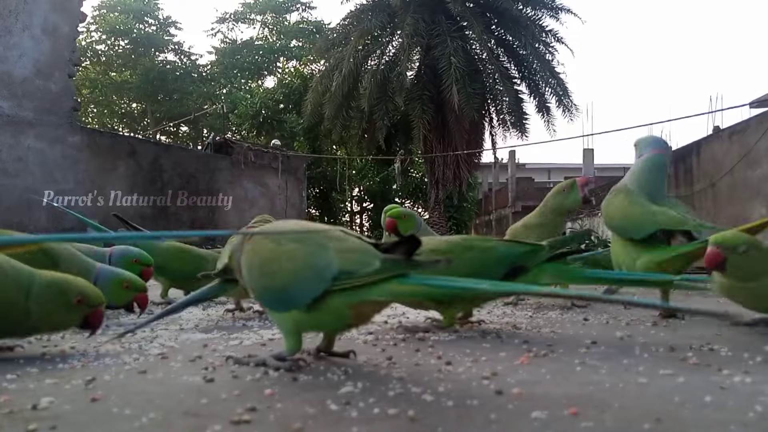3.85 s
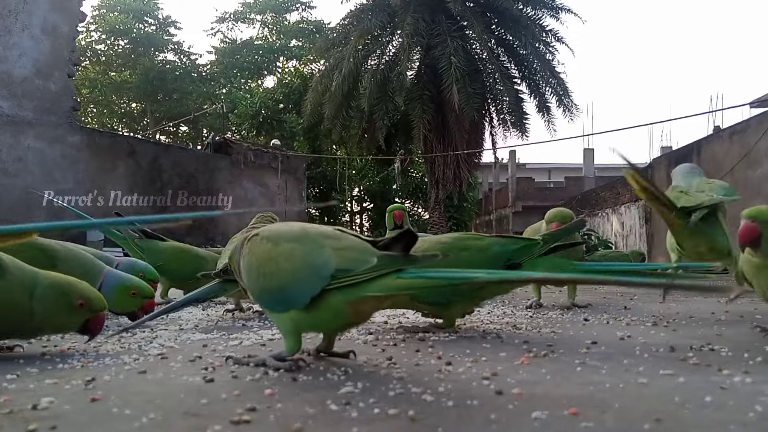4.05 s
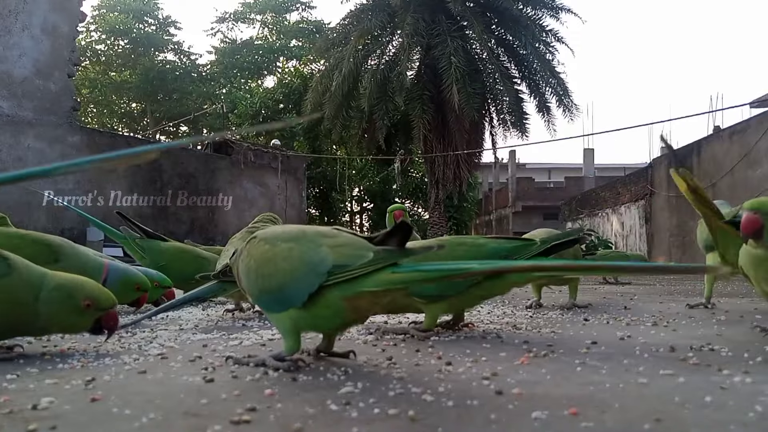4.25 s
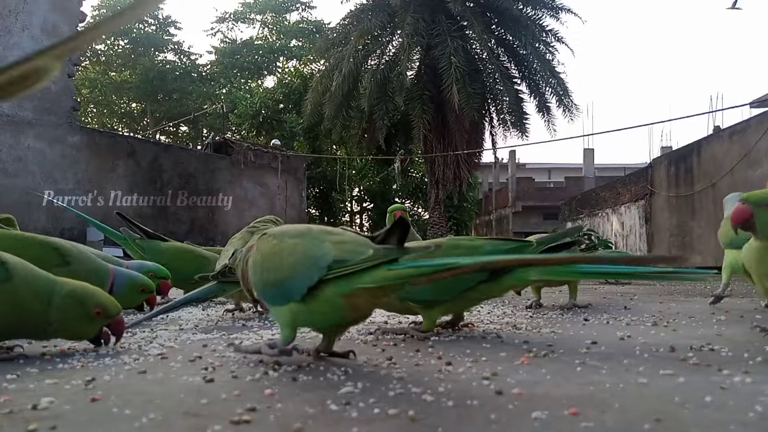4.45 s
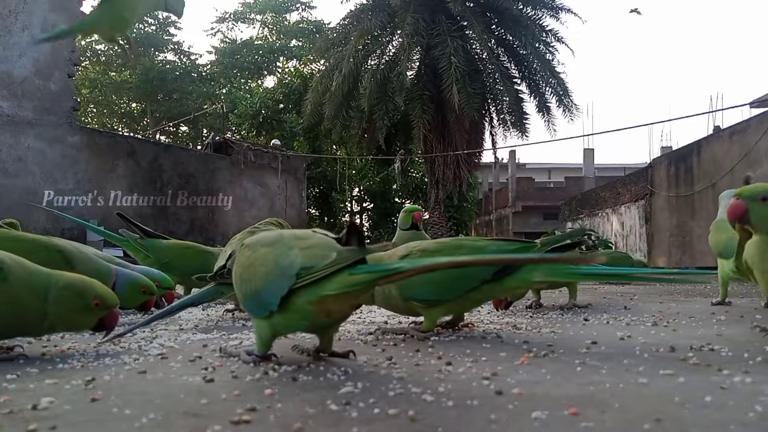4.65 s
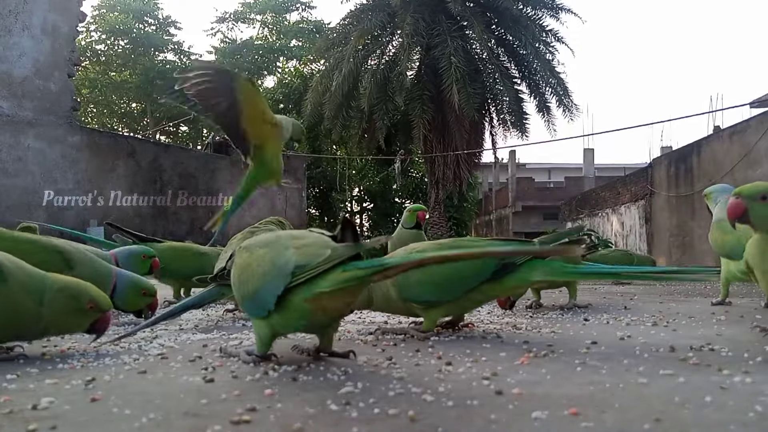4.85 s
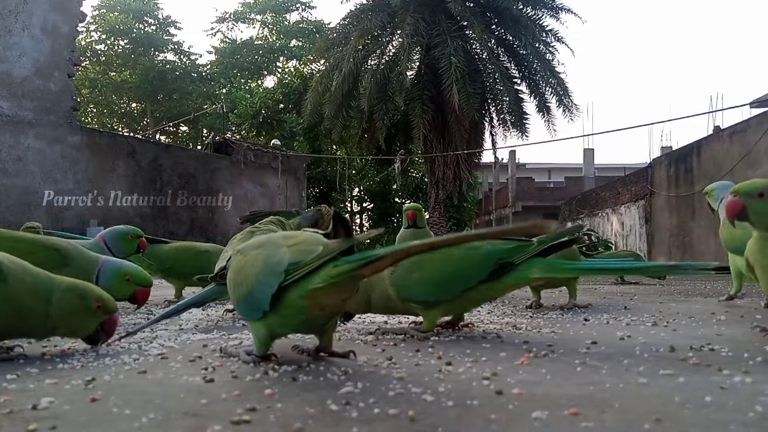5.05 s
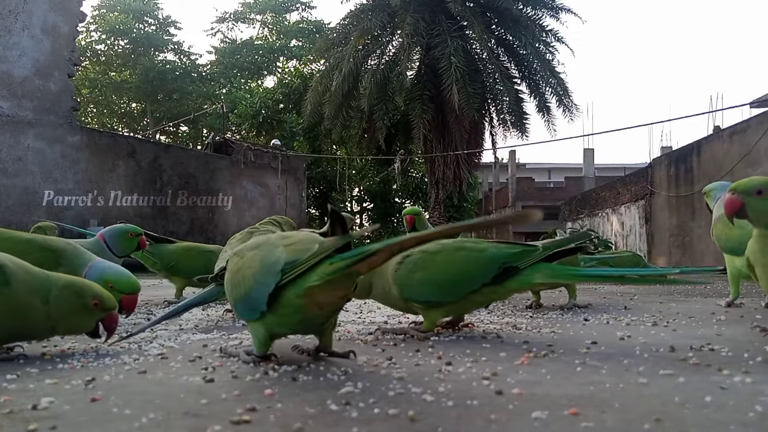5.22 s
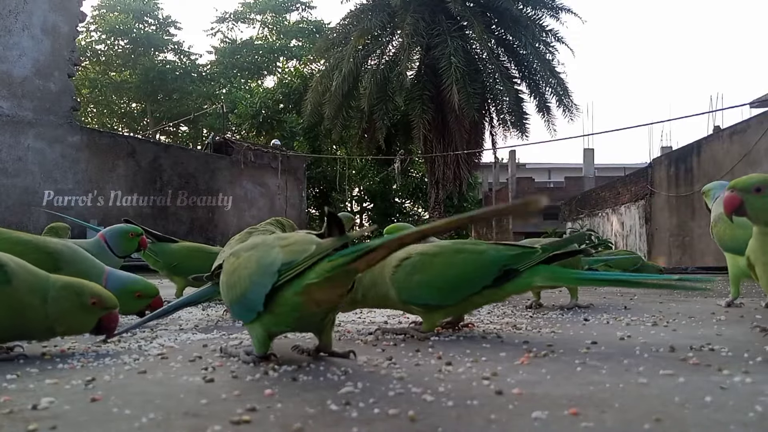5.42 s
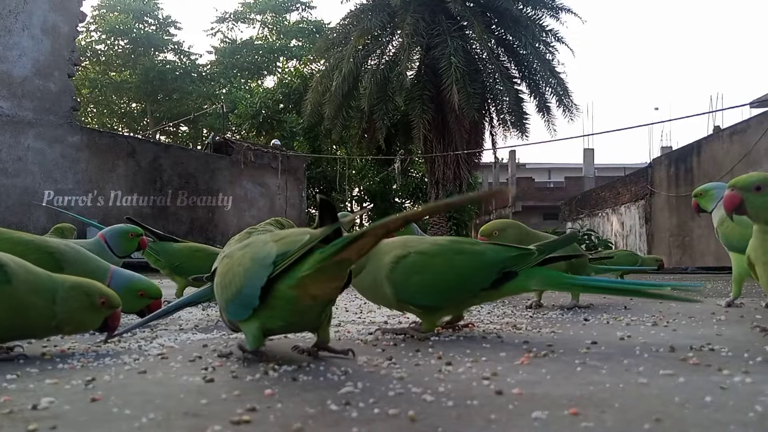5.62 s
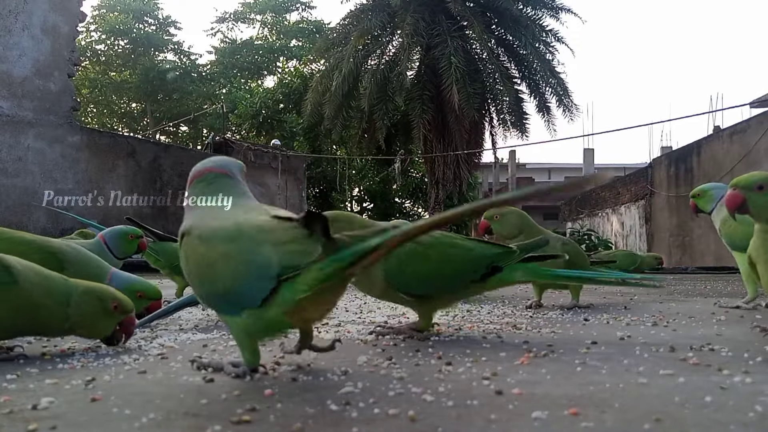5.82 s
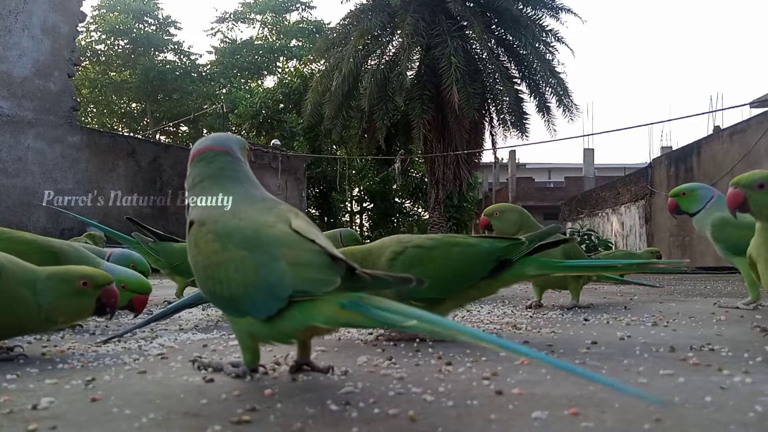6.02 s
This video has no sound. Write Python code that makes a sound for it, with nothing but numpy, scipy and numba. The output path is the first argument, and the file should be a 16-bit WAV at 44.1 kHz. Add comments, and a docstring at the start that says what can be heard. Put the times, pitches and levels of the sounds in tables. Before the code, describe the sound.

Parakeets feeding on a hard open surface: faint beak ticks, distant squawks and wing thumps, then suddenly loud whistled chirps right beside the microphone.

```python
"""A walled concrete roof where parakeets feed. Birds next to the microphone whistle, chuck and trill as stacked
partials; growls ring a throat tube with slow pulses. Calls and screeches from further off are rasped tones and
throbbing whistles in noise, blurred by echoes off the walls. Beaks tick as short rings, wing draughts
thump and rustle as gusty noise, a thin band of noise whines in the distance over the hush of the town."""
import sys
import numpy as np
from scipy import signal
from scipy.fft import rfft, irfft
from scipy.io import wavfile
from scipy.ndimage import uniform_filter1d
from numba import njit

SR = 44100
rng = np.random.default_rng(int(sys.argv[2]) if len(sys.argv) > 2 else 0)


def materialize(psi):
    """Save the field psi as 16-bit PCM at rate SR to the path in sys.argv[1].

    A 1-D psi becomes a single channel; in a 2-D psi each row is a channel.
    """
    bounded = np.clip(np.atleast_2d(psi).T, -1, 1)
    quanta = np.round(bounded * 32767).astype(np.int16)
    wavfile.write(sys.argv[1], SR, quanta)


N = 272538
TOP_HZ = 15700  # upper limit of voices and recorder


def undb(db):
    """Amplitude factor of a level in dB."""
    return 10 ** (np.asarray(db) / 20)


def unit(x):
    """Scale to rms 1."""
    return x / np.sqrt(np.mean(x ** 2))


def colour(points, hz):
    """Level in dB of a spectrum table at given frequencies, interpolated over log frequency."""
    f, db = np.transpose(points)
    return np.interp(np.log(hz), np.log(f), db)


def spectrum_noise(db, hz_share=1.0):
    """Noise of length N whose spectrum follows a level in dB and an optional share per frequency."""
    return irfft(rfft(rng.standard_normal(N)) * hz_share * undb(db), N)


def spectrum_hz():
    """Frequencies of the spectrum bins, at least 1 Hz."""
    return np.maximum(np.arange(N // 2 + 1) * SR / N, 1)


def read(rows, fade_s):
    """First sample, a soft-edged gate and the columns of a curve table, sample by sample."""
    s, *columns = np.transpose(rows)
    i = np.arange(int(s[0] * SR), min(int(s[-1] * SR), N))
    gate = np.clip(np.minimum(i - i[0], i[-1] - i) / (fade_s * SR), 0, 1)
    heard = i >= 0
    return max(i[0], 0), gate[heard], [np.interp(i[heard] / SR, s, c) for c in columns]


def walk(rate_hz, size=N):
    """Random levels held 1 / rate_hz seconds and smoothed twice; spread near 1."""
    k = max(int(SR / rate_hz), 1)
    held = np.repeat(rng.standard_normal(size // k + 1), k)
    return 1.4 * uniform_filter1d(uniform_filter1d(held, k), k)[:size]


@njit
def svf(x, hz, width):
    """State-variable band-pass with a moving centre, gain 1 at the centre."""
    y, b, l = np.empty(len(x)), 0., 0.
    for i in range(len(x)):
        g, k = np.tan(np.pi * hz[i] / SR), width / hz[i]
        v = (b + g * (x[i] - l)) / (1 + g * (g + k))
        b, l, y[i] = 2 * v - b, l + 2 * g * v, k * v
    return y


def band(x, hz, width_hz):
    """One resonance with a fixed or moving centre."""
    return svf(x, np.clip(hz + np.zeros(len(x)), 10, SR / 2.2), 1. * width_hz)


def steep(x, hz, width_hz):
    """A resonance applied twice, at rms 1."""
    return unit(band(band(x, hz, width_hz), hz, width_hz))


def walls(x, t60_s, wet_db, first_s):
    """Direct sound plus a dense decaying cloud of echoes; the walls return little bass."""
    t = np.arange(int(SR * t60_s)) / SR
    echoes = band(rng.standard_normal(SR)[:len(t)], 3800, 5500)
    cloud = echoes * np.exp(-np.log(1000) * t / t60_s) * (t > first_s)
    cloud = cloud * undb(wet_db) / np.sqrt(np.sum(cloud ** 2))
    return x + signal.fftconvolve(x, cloud)[:N]


def town():
    """Distant hush: shaped noise whose octaves flicker a little on their own."""
    # Town spectrum. Each row: frequency in Hz, relative level in dB.
    town_spectrum = [(15, -63), (25, -37), (48, -5.5), (150, -2), (333, -7), (399, -7), (1080, -15),
                     (1330, -11), (1710, -14.5), (2140, -3), (2690, -21), (2940, -12), (3220, -18.5),
                     (4130, -20.5), (5680, -25.5), (7380, -52), (12500, -120)]
    level_db = -68.5
    hz = spectrum_hz()
    out = 0
    for centre_hz in 31.25 * 2 ** np.arange(10):
        share = np.cos(np.pi / 2 * np.clip(np.log2(hz / centre_hz), -1, 1))
        out = out + undb(1.0 * walk(20)) * spectrum_noise(colour(town_spectrum, hz), share)
    return unit(out) * undb(level_db)


def whine():
    """A thin band of noise, wavering in level, with a gliding pitch."""
    # Whine glide. Each row: time in seconds, centre in Hz, level in dB.
    glide = [(1.2, 1160, -82.5), (1.36, 1228, -76), (1.9, 1282, -66.5), (2.6, 1354, -69), (2.75, 1337, -62),
             (2.82, 1365, -77.5), (3.2, 1380, -75)]
    out = np.zeros(N)
    a, gate, (hz, db) = read(glide, 0.022)
    size = len(hz)
    tone = steep(rng.standard_normal(N)[:size], hz, 100)
    out[a:a + size] = gate * undb(db + 3 * walk(12)[:size]) * tone
    return out


def draught():
    """Air from beating wings buffets the microphone: gusty thumps with a wandering rustle on top."""
    # Wing beats. Each row: start, strongest point and end in seconds, thump level in dB, rustle level in dB,
    # rustle centre in Hz.
    wing_beats = [(1.627, 1.686, 1.74, -61, -66.5, 220), (1.68, 1.713, 1.76, -66, -56.5, 315),
                  (1.731, 1.78, 1.84, -55.5, -61, 252), (1.817, 1.903, 1.95, -53, -57, 302),
                  (1.94, 1.991, 2.04, -59, -57, 277), (2.017, 2.08, 2.15, -57.5, -55, 230),
                  (2.14, 2.215, 2.26, -64, -67, 220), (4.445, 4.606, 4.8, -64.5, -66.5, 258)]
    rise_db, fall_db = -13, -12
    feather_ratio, feather_db = 2.4, -10.5  # a fainter upper rustle
    out = np.zeros(N)
    for s, top, end, thump_db, rustle_db, hz in wing_beats:
        a, gate, (db,) = read([(s, rise_db), (top, 0), (end, fall_db)], 0.011)
        size = len(gate)
        air = rng.standard_normal(N)[:size] * undb(3 * walk(25)[:size])
        centre_hz = hz * undb(1.2 * walk(15)[:size])
        thump = steep(air, 85, 48)
        rustle = steep(air, centre_hz, 190)
        rustle = rustle + undb(feather_db) * steep(air, feather_ratio * centre_hz, 250)
        out[a:a + size] += gate * undb(db) * (undb(thump_db) * thump + undb(rustle_db) * rustle)
    return out


def ticks():
    """Beaks on seed and concrete: each tick is a short ring with a crack of treble; small ones fall at random."""
    # Beak ticks. Each row: time in seconds, ring level in dB, ring pitch in Hz, treble in dB against the ring.
    beak_ticks = [(0.3137, -48, 2140, -21), (0.5526, -53, 2240, -34), (0.7487, -46, 1900, -32),
                  (0.857, -48, 1800, -25), (0.9234, -51.5, 1390, -22), (1.0076, -50, 2090, -27),
                  (1.2481, -52, 2100, -29), (1.6242, -54, 1280, 2), (1.7855, -44, 1280, -9),
                  (2.4694, -46, 2040, -20), (2.802, -56, 2000, -4), (3.5099, -42.5, 2180, -27),
                  (3.5716, -50.5, 1930, -24), (3.6632, -42, 2100, -25), (3.673, -52, 2090, -2),
                  (3.9069, -41.5, 1720, -22), (3.9233, -45, 2100, -24), (4.4992, -50.5, 1790, -21),
                  (6.0175, -46, 2360, -36)]
    out, t = np.zeros(N + SR), np.arange(int(.012 * SR)) / SR
    small = [(N / SR * a, -64 + 8 * b, 1200 + 1500 * c, -14.) for a, b, c in rng.random((40, 3))]
    for s, db, hz, treble_db in list(beak_ticks) + small:
        a = int(s * SR)
        crack = steep(rng.standard_normal(len(t)), 4500, 4000) * np.exp(-t / .0006)
        ring = np.sin(2 * np.pi * hz * t) * np.exp(-t / .0009)
        out[a:a + len(t)] += undb(db) * (ring + undb(treble_db) * crack)
    return out[:N]


def screeches():
    """An unsteady whistle whose pitch and level throb fast, with turbulent air around it."""
    # Far screeches. Each row: start in seconds, length in seconds, level in dB, first and last pitch in Hz,
    # mean throb rate in Hz, throb depth in dB, broad breath in dB.
    screech_rows = [(-.06, 0.47, -57.5, 3334, 3642, 168.6, 1, -14),
                    (1.82, .39, -54, 3274, 3750, 169.6, 2.5, -4), (2.255, 0.083, -49, 3700, 3880, 64, 5, 5),
                    (2.806, 0.16, -57.5, 3860, 3550, 56.8, 11.5, -11),
                    (3.453, 0.14, -66.5, 3600, 3860, 150, 3, -18),
                    (4.64, 0.48, -51.5, 4610, 3554, 184, 3.5, -4)]
    # Swell common to all. Each row: share of length, level in dB, upper band in dB, share of the glide done.
    swell = [(0, -19, -16.5, 0), (0.131, -8, -19, .4), (0.271, 0, -29, .6), (.45, 0.5, -28, .8),
             (.6, -2, -9.5, .85), (.8, -9, -0.5, 1), (1, -24, -3.5, 0.99)]
    lower_band_db = -11  # a faint strand under each screech
    out, (share, swell_db, top_db, glide) = np.zeros(N), np.transpose(swell)
    for s, length, level_db, first, last, throb_hz, depth_db, broad_db in screech_rows:
        pitch_hz = first + (last - first) * glide
        rows = np.transpose([s + length * share, level_db + swell_db, pitch_hz, top_db])
        a, gate, (db, hz, upper_db) = read(rows, 0.0081)
        size = len(hz)
        slow, quick, air = walk(40)[:size], walk(120)[:size], rng.standard_normal(N)[:size]
        throb = np.sin(2 * np.pi * np.cumsum(throb_hz * (1 + 0.097 * slow)) / SR)
        whistle_hz = hz * (1 + .011 * depth_db * throb + .02 * quick)
        whistle = np.sqrt(2) * np.sin(2 * np.pi * np.cumsum(whistle_hz) / SR)
        breath = .5 * steep(air, hz, 810)
        breath = breath + undb(upper_db) * steep(air, 1.21 * hz, 160)
        breath = breath + undb(broad_db) * steep(band(air, hz, 1800), hz, 1300)
        breath = breath + undb(lower_band_db) * steep(air, .8 * hz, 250)
        out[a:a + size] += gate * undb(db) * unit(undb(depth_db * throb) * (whistle + breath))
    return out


def growls():
    """Slow, soft, uneven glottal pulses ring the throat tube."""
    # Creaky growls. Each row: start, loudest point and end in seconds, first and last mean pulse rate in Hz,
    # level in dB, throat pitch in Hz, lift of the upper resonances in dB.
    growl_rows = [(2.946, 3.025, 3.065, 77.7, 112.1, -46.5, 781, 3.5),
                  (4.49, 4.611, 4.613, 86, 129, -49, 945, 4)]
    # Throat tube resonances. Each row: multiple of throat pitch, width in Hz, level in dB.
    tube = [(1, 240, 0), (1.95, 420, -3), (4.0, 700, -13), (6.5, 1400, -30)]
    mutter_db, surge_s, end_db = -22.5, .04, -28  # a mutter, then a surge
    out = np.zeros(N)
    for s, loudest, end, first, last, level_db, hz, lift_db in growl_rows:
        low_db, surge = level_db + mutter_db, max(loudest - surge_s, s)
        rows = [(s, first, low_db), (surge, first, low_db + 6),
                (loudest, last, level_db), (end, last, level_db + end_db)]
        a, gate, (rate_hz, db) = read(rows, 0.0029)
        size = len(db)
        cycles = np.cumsum(rate_hz * (1 + .09 * walk(80)[:size])) / SR
        pulses = -np.diff(np.floor(cycles), prepend=0) * undb(2 * walk(71.8)[:size])
        pulses = uniform_filter1d(pulses, size=5)  # the folds close softly
        ring = sum(undb(g_db + lift_db * (m > 1)) * steep(pulses, m * hz, w) for m, w, g_db in tube)
        out[a:a + size] += gate * undb(db) * ring
    return out


def notes(table, flutter_db, jitter, breath_db):
    """Syrinx tones: partials in pulse phase; those above the listed ones follow the throat."""
    # Throat response. Each row: frequency in Hz, relative level in dB.
    throat = [(500, -11), (1500, 16), (2200, 13), (3200, 2.5), (4500, -13.5), (6000, -36.5), (9000, -59.5),
              (11000, -57.5), (13000, -76), (16000, -65)]
    out = np.zeros(N)
    flutter, waver = undb(flutter_db * walk(180)), 1 + jitter * walk(300)
    air = steep(rng.standard_normal(N), 210, 230)
    for rows in table:
        a, gate, (hz, *db) = read(rows, max(.0025, 2 / rows[0][1]))
        part, top = slice(a, a + len(hz)), len(db)
        turn = 2 * np.pi * np.cumsum(hz * waver[part]) / SR
        for k in range(1, int(TOP_HZ / hz.min())):
            if k <= top:
                level_db = db[k - 1]
            else:
                level_db = db[-1] + colour(throat, k * hz) - colour(throat, top * hz)
            # escaping air smears the upper partials most
            halo = 1 + min(k ** 2 * undb(breath_db), .7) * air[part]
            level = gate * halo * undb(level_db) * (k * hz < TOP_HZ)
            out[part] -= level * np.sqrt(2) * np.cos(k * turn)
    return out * flutter


def call(s, length, first, top, last, share, db1, db2, rasp_db, rasp_hz):
    """Pitch and level arch up to a top and fall away; a rasp chops the level."""
    onset_db, end_db = -4, -2.5  # against the top
    fall_power = 1.25  # 1 = straight fall, more = rounder arch
    thin_db_per_octave = 27  # the 1st partial thins out as the pitch drops below its top
    beak_hz, beak_db_per_octave = 3750, 28  # the 2nd partial is loudest nearest the beak's resonance
    t = np.linspace(0, length, num=80)
    u = t / length - np.clip(share, .02, .98)
    rise, fall = np.maximum(u / u[0], 0), np.maximum(u / u[-1], 0)
    hz = top + (first - top) * rise ** 2 + (last - top) * fall ** fall_power
    shape_db = onset_db * rise + end_db * fall ** 2 + rasp_db * np.sin(2 * np.pi * rasp_hz * t)
    off_octaves = np.abs(np.log2(2 * hz / beak_hz))
    first_db = db1 + shape_db + thin_db_per_octave * np.log2(hz / top)
    second_db = db2 + shape_db - beak_db_per_octave * (off_octaves - off_octaves.min())
    return np.transpose([s + t, hz, first_db, second_db])


def far_birds():
    """Birds further off: rasped calls, one long arched call from the middle distance, and screeches."""
    # Far calls. Each row: start in seconds, length in seconds, first, top and last pitch in Hz, share of length
    # to the top, 1st and 2nd partial in dB, rasp depth in dB.
    far_calls = [ (0.376, 0.13, 3050, 3100, 2810, .5, -65.5, -92, 3.5),
                 (0.412, 0.059, 2230, 2120, 1414, .05, -71, -61, -0.5),
                 (0.558, 0.053, 3560, 3550, 3340, 0.31, -69, -110, 1),
                 (0.652, 0.038, 2830, 2966, 2640, 0.38, -72, -75, -2),
                 (0.855, 0.079, 1980, 2314, 1674, 0.16, -68.5, -61.5, 1),
                 (0.963, 0.045, 2050, 1980, 1360, .1, -84, -70.5, -2),
                 (1.351, 0.023, 1485, 1510, 2390, 0.056, -84, -54.5, -3),
                 (1.371, 0.033, 3140, 3150, 2920, 0.42, -47, -76, 1.5),
                 (1.408, 0.068, 2200, 2213, 1510, 0.11, -62.5, -53, -1),
                 (1.447, 0.05, 2210, 2155, 1864, .05, -61, -57, -3),
                 (1.501, 0.063, 2110, 2287, 1600, .15, -82, -63, -6.5),
                 (2.224, 0.034, 2690, 3043, 2940, 0.53, -42.5, -62, 1.5),
                 (2.255, 0.067, 1996, 2188, 1930, .12, -48, -59, 6),
                 (2.3, 0.057, 1430, 1478, 1080, 0.31, -64, -44, 1.5),
                 (2.797, 0.085, 1600, 1970, 1674, 0.058, -65.5, -50, 4),
                 (2.805, 0.062, 2025, 2292, 2160, 0.32, -50, -59, 4),
                 (2.84, 0.05, 2650, 2825, 2440, 0.11, -52, -92, 8),
                 (3.457, 0.12, 2170, 2180, 1576, 0.34, -76, -68, -4),
                 (3.73, 0.096, 2020, 2320, 1550, .25, -89, -79.5, 8),
                 (4.245, 0.069, 2830, 3040, 2810, 0.49, -64.5, -89, 5.5),
                 (4.304, 0.041, 2010, 2134, 1600, 0.14, -71, -58, -1),
                 (4.455, 0.054, 3450, 3500, 3370, .1, -76, -110, 0),
                 (4.517, 0.051, 2070, 2130, 1870, 0.086, -77, -67.5, 0)]
    # Long arched call. Each row: time in seconds, pitch in Hz, 1st and 2nd partial in dB.
    arched_call = [(2.533, 1130, -89, -70), (2.545, 1736, -68, -63), (2.555, 2047, -53, -59),
                   (2.572, 2110, -44.5, -77), (2.59, 1993, -43, -47), (2.6, 1884, -56, -44.5),
                   (2.612, 1630, -64, -43), (2.625, 1607, -53, -54.5), (2.642, 1589, -61, -41),
                   (2.662, 1240, -85, -58)]
    rasp_hz = 62
    curves = [call(*row, rasp_hz) for row in far_calls] + [arched_call]
    return notes(curves, flutter_db=3.5, jitter=0.0054, breath_db=-22.0) + screeches()


def chuck(s, length, first, last, *partials_db):
    """A low buzz: quick attack, slow sag, quick release, over a gliding pitch."""
    attack_s, release_s, sag_db, edge_db = .006, 0.0097, -4.5, -11
    times = np.array([0, attack_s, max(length - release_s, attack_s), length])
    shape_db = np.array([edge_db, 0, sag_db, edge_db])
    hz = first + (last - first) * times / length
    return np.transpose([s + times, hz] + [db + shape_db for db in partials_db])


def near_birds():
    """Birds next to the microphone: whistles, buzzing chucks and one trilled note."""
    # Close whistles, one list each. Each row: time in seconds, pitch in Hz, 1st, 2nd and 3rd partial in dB.
    whistles = [
        [(4.81, 2215, -65, -57, -103), (4.82, 2160, -38.5, -60.5, -100), (4.826, 2045, -31, -48, -92),
         (4.832, 1855, -36.5, -56.5, -100), (4.84, 1870, -67, -60, -100)],
        [(5.066, 2222, -58, -78, -103), (5.074, 2182, -29.5, -58, -101), (5.085, 2015, -27, -55, -105),
         (5.093, 1821, -31.5, -64, -90), (5.101, 1480, -31.5, -56, -84), (5.11, 1057, -37, -33.5, -47.5),
         (5.118, 650, -44.5, -32.5, -46), (5.126, 504, -47, -49.5, -36.5), (5.139, 405, -66, -49, -59.5)],
        [(5.484, 709, -65, -45.5, -29.5), (5.489, 662, -42, -25.5, -40), (5.497, 1042, -28.5, -24.5, -48),
         (5.503, 1540, -18.5, -35, -36.5), (5.507, 2333, -14.5, -41.5, -77), (5.512, 2702, -27, -45, -75.5),
         (5.522, 2943, -22.5, -57.5, -72), (5.532, 2918, -20.5, -51, -71.5), (5.542, 2814, -22.5, -43, -77),
         (5.56, 2401, -14.5, -30.5, -61), (5.575, 2144, -14, -46, -64.5), (5.586, 1913, -15.5, -46.5, -74),
         (5.594, 1570, -23.5, -46, -60), (5.604, 1456, -23.5, -53, -89.5), (5.611, 1490, -58, -68, -93.5)],
        [(5.748, 925, -39.5, -24, -28), (5.752, 1077, -32.5, -17, -34), (5.756, 1646, -20, -29, -28.5),
         (5.76, 2124, -14.5, -26, -74.5), (5.765, 2316, -21, -50.5, -92)],
        [(5.789, 2453, -16.5, -46.5, -88), (5.793, 2297, -16, -25.5, -74.5), (5.805, 2305, -14, -20, -82.5),
         (5.815, 2110, -20, -20.5, -53), (5.824, 2007, -19, -26.5, -45), (5.835, 1924, -21, -21, -40.5),
         (5.85, 1772, -26, -16.5, -38), (5.858, 1646, -30, -22, -43), (5.865, 1477, -33.5, -27.5, -43),
         (5.872, 1404, -60, -72, -66)],
    ]
    # Close chucks. Each row: start in seconds, length in seconds, first and last pitch in Hz, 1st, 2nd and
    # 3rd partial in dB.
    chuck_rows = [(4.437, 0.033, 566, 415, -57.5, -53.5, -50.5),
                  (4.61, 0.036, 608.5, 422.4, -41.5, -43.5, -39.5),
                  (4.85, 0.027, 438.6, 354, -58, -55.5, -44.5), (5.652, .06, 580, 548, -45.5, -42, -43),
                  (5.733, 0.017, 471, 473, -78.5, -36.5, -26)]
    # Close trill. One row: start in seconds, length in seconds, first, top and last pitch in Hz, share of length
    # to the top, 1st and 2nd partial in dB, trill depth in dB, trill rate in Hz.
    trill = (5.761, 0.0265, 3176, 3166, 2922.5, 0.23, -20, -52, 1.5, 140.5)
    curves = whistles + [chuck(*row) for row in chuck_rows] + [call(*trill)]
    near = notes(curves, flutter_db=.6, jitter=.005, breath_db=-27)
    # small birds radiate no bass
    return signal.sosfilt(signal.butter(4, 330, "high", fs=SR, output="sos"), near)


def scene():
    """Set each source between its walls, dull the far ones and mix."""
    # Walls near the microphone, walls far off, and concrete right under the growling bird. Each row: 60 dB decay
    # in seconds, echo level in dB, first echo in seconds.
    near_walls = (0.34, -20.5, 0.0007)
    far_walls = (.28, -9, .012)
    growl_walls = (.045, -7, .0017)
    dull_hz = 6000  # little above this but close calls and a trace of the pecks
    near = walls(near_birds(), *near_walls)
    pecks = walls(ticks(), *near_walls)
    dull = walls(far_birds(), *far_walls) + walls(growls(), *growl_walls) + pecks
    dull = signal.sosfilt(signal.butter(8, dull_hz, fs=SR, output="sos"), dull)
    return (near + undb(-20.5) * pecks + dull + draught() + whine() + town())[None]


def record(dry):
    """The recorder adds its faint hiss and cuts the top."""
    # Recorder self-noise. Each row: frequency in Hz, relative level in dB.
    hiss_spectrum = [(5000, -24), (7000, -1), (9000, -9.5), (13000, -12), (15300, -5.5)]
    hiss_db = -93
    hiss = unit(spectrum_noise(colour(hiss_spectrum, spectrum_hz()))) * undb(hiss_db)
    return signal.sosfilt(signal.ellip(8, .2, 70, TOP_HZ, fs=SR, output="sos"), dry + hiss)


dry = scene()
out = record(dry)
materialize(out)
```